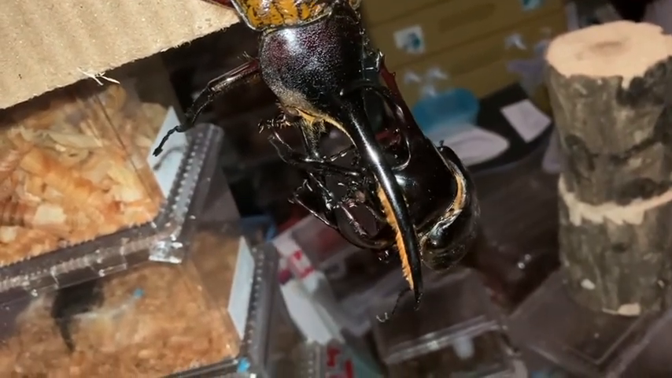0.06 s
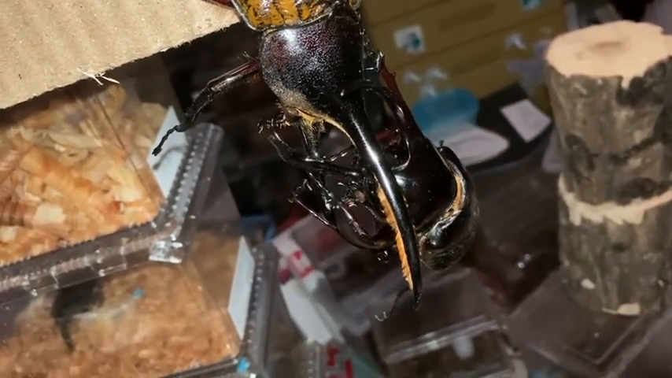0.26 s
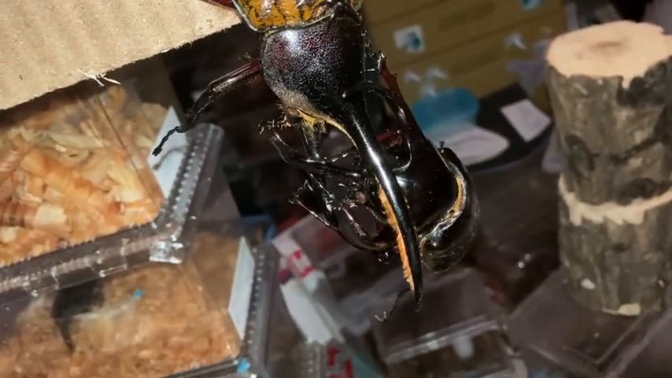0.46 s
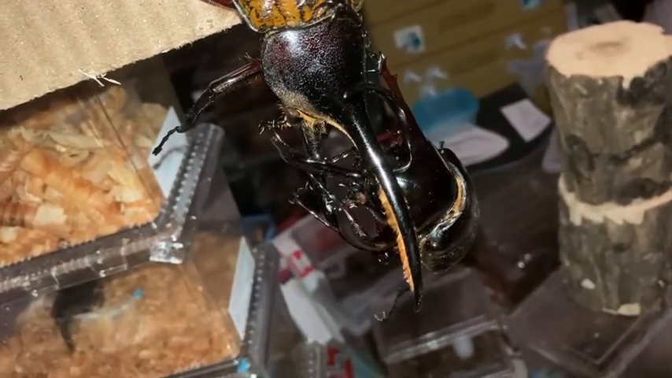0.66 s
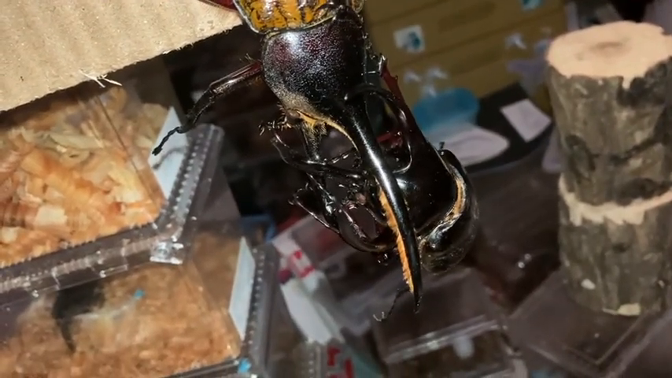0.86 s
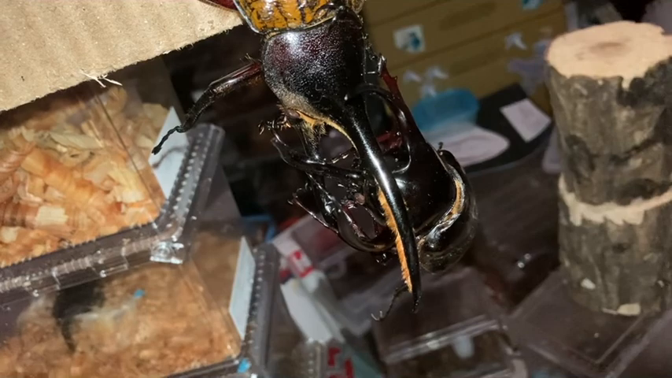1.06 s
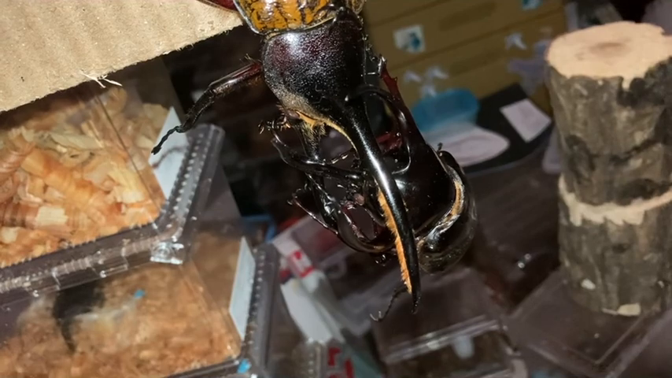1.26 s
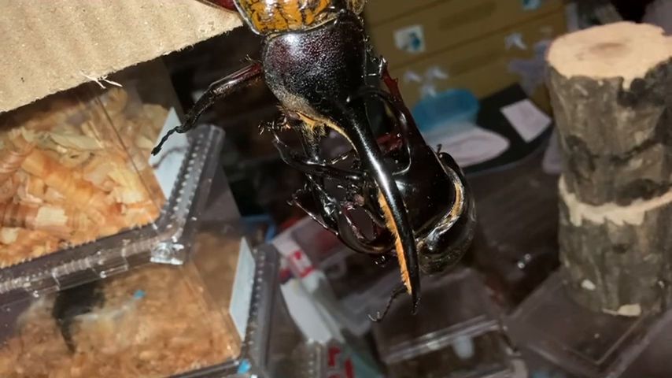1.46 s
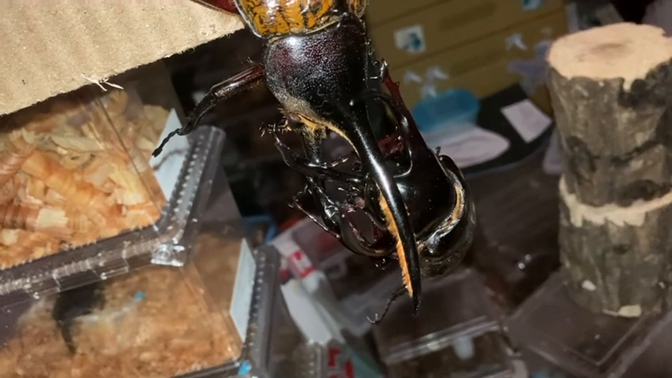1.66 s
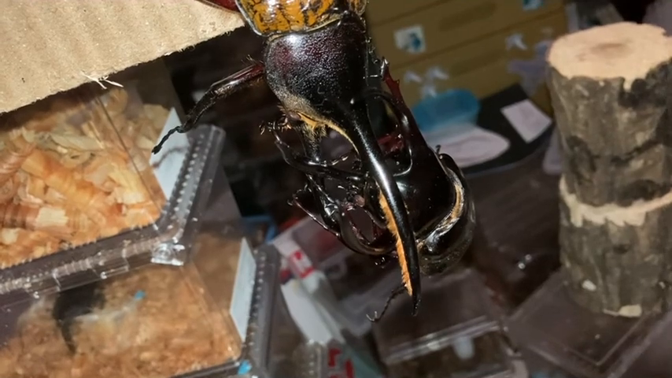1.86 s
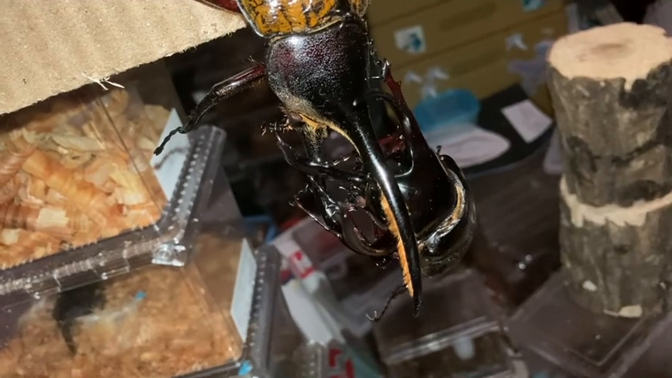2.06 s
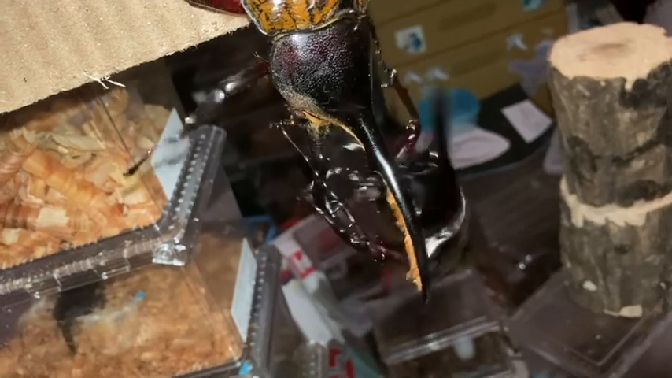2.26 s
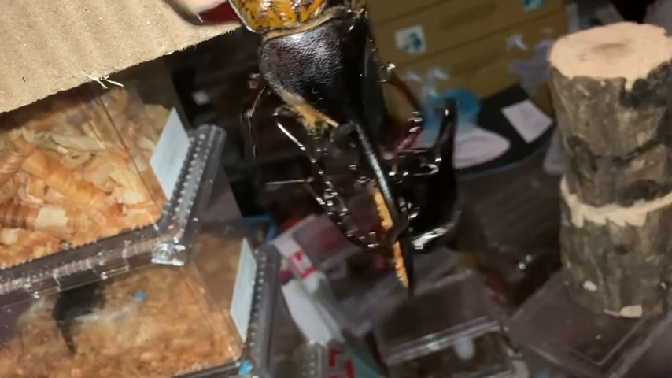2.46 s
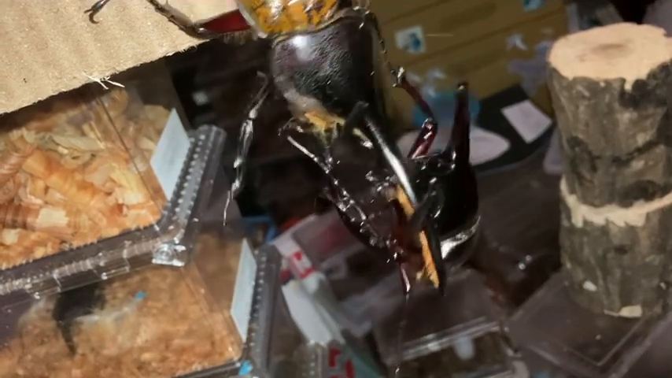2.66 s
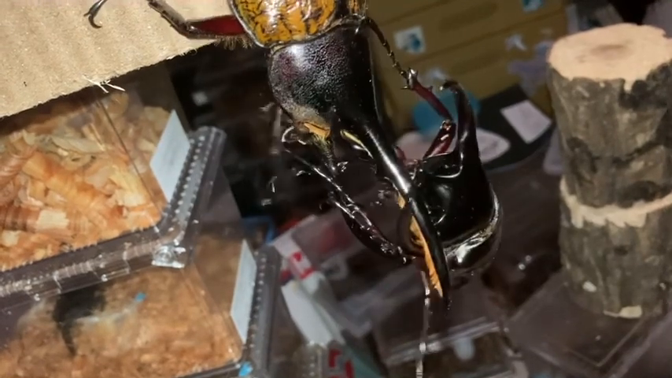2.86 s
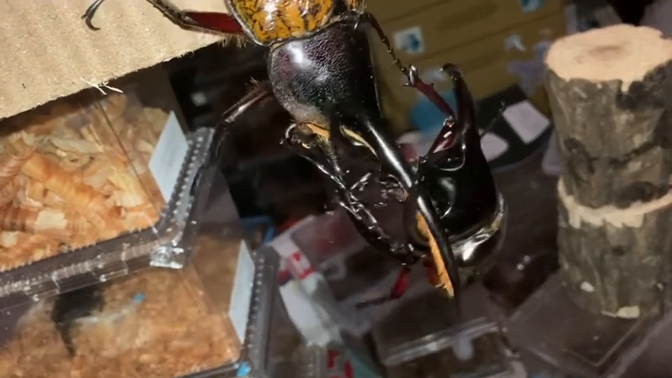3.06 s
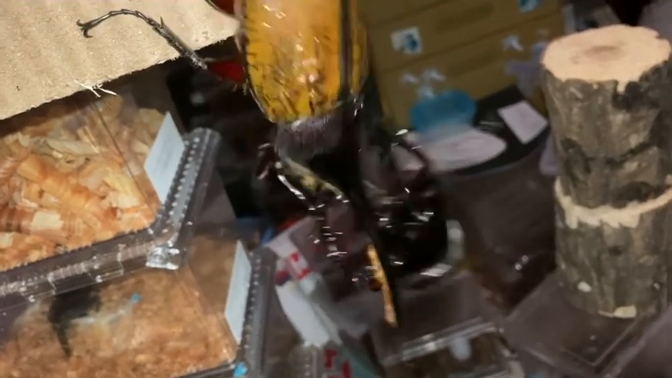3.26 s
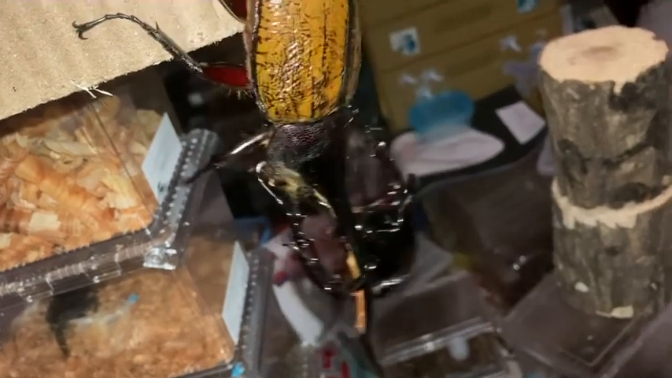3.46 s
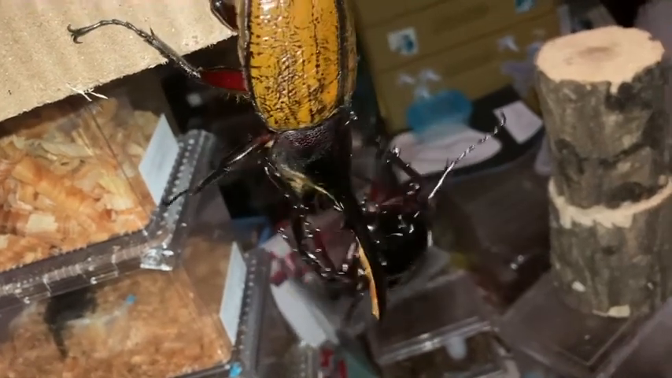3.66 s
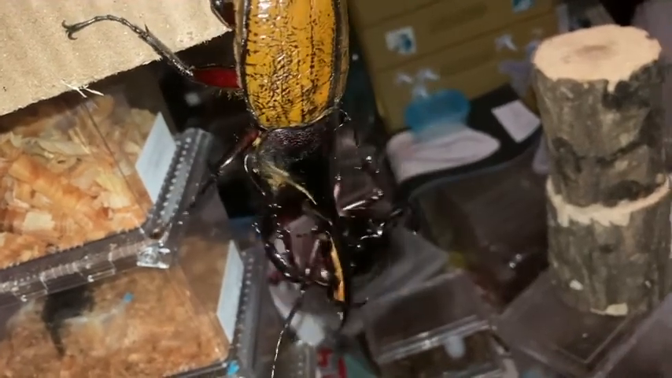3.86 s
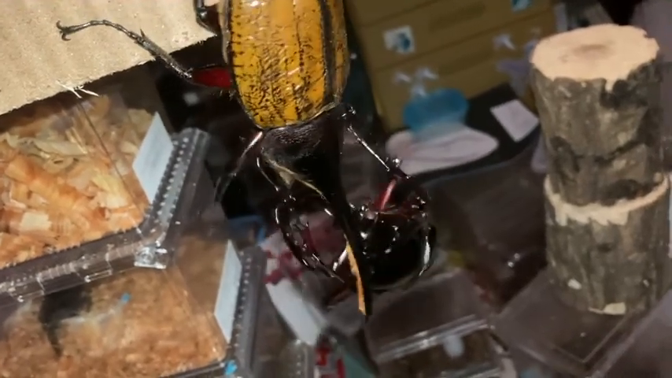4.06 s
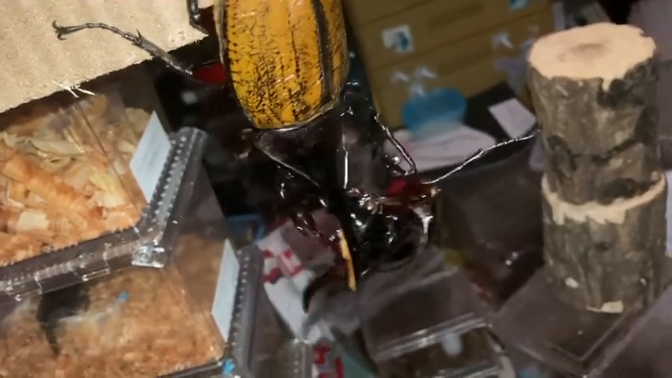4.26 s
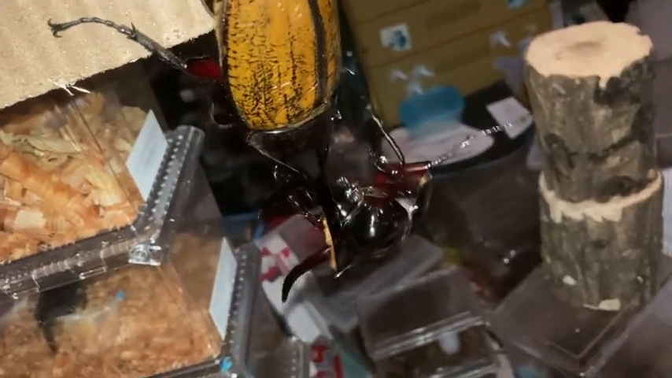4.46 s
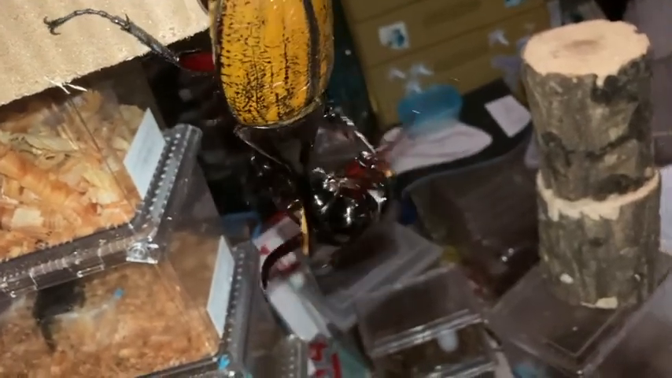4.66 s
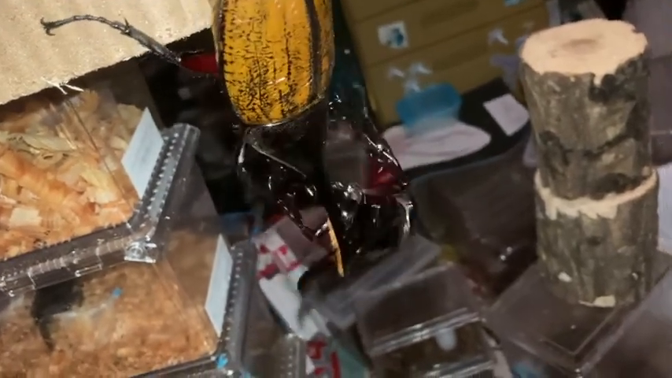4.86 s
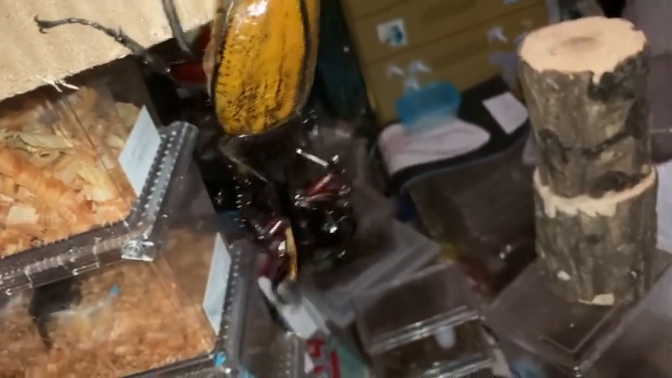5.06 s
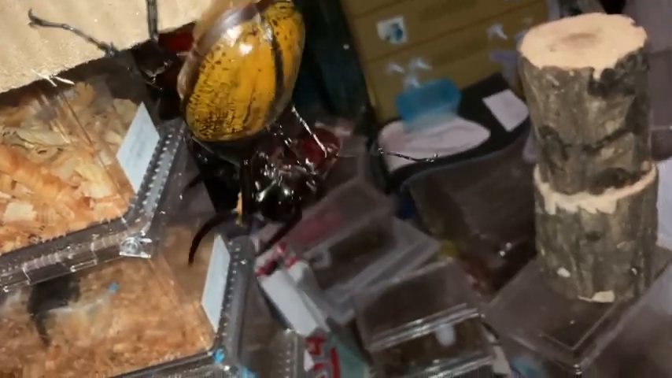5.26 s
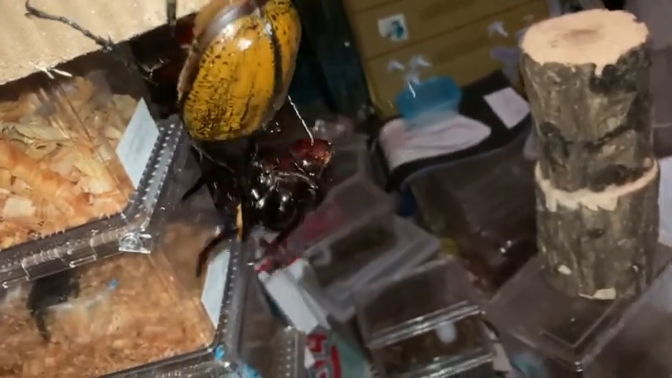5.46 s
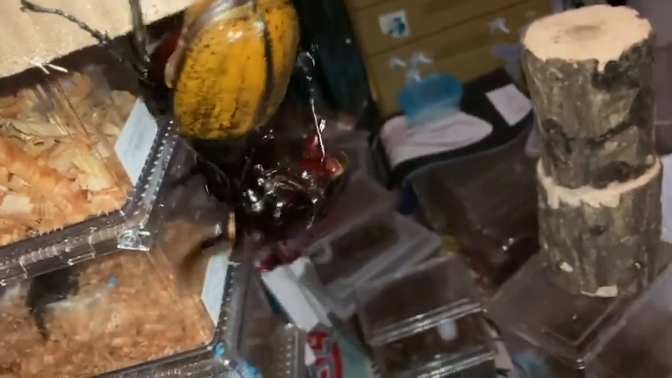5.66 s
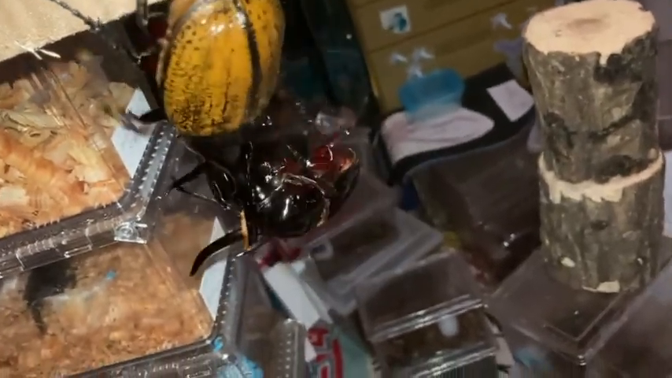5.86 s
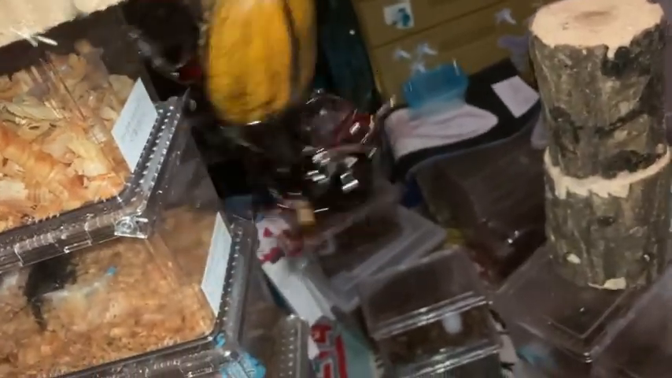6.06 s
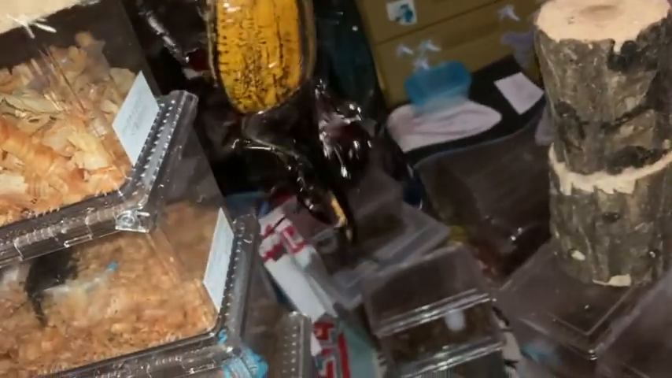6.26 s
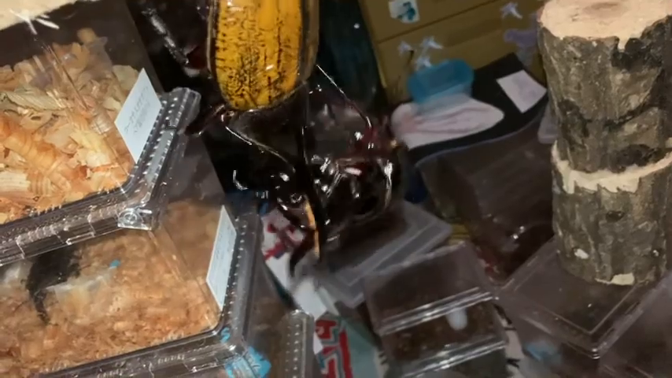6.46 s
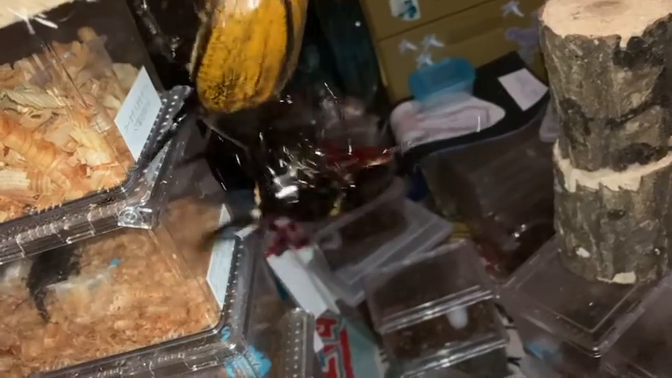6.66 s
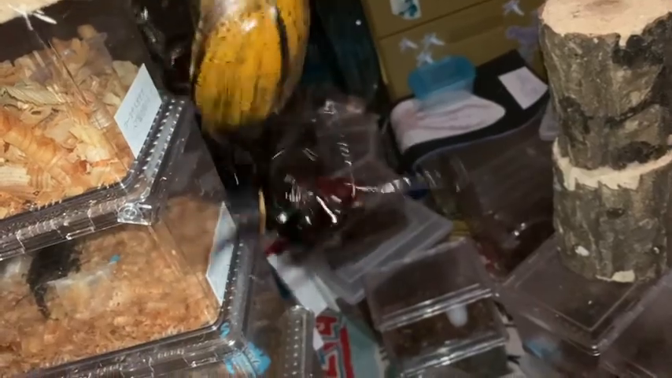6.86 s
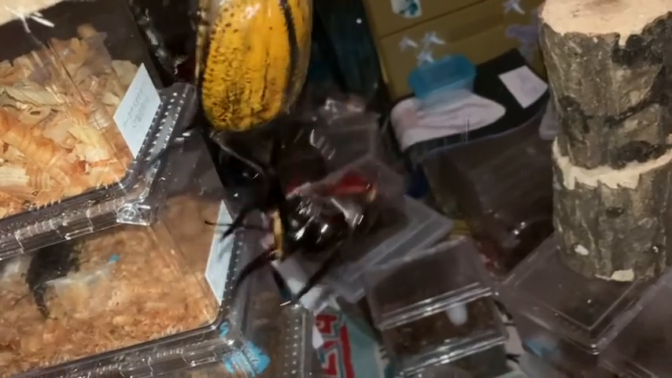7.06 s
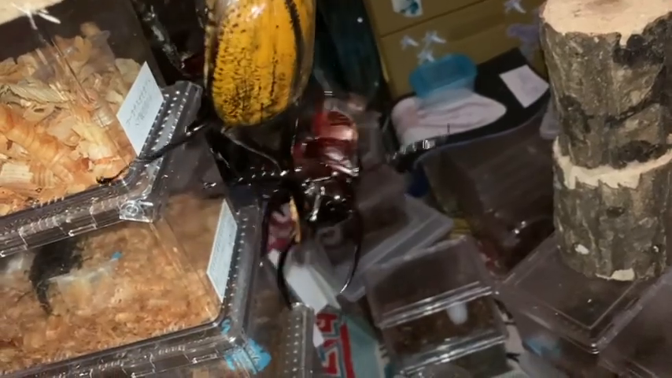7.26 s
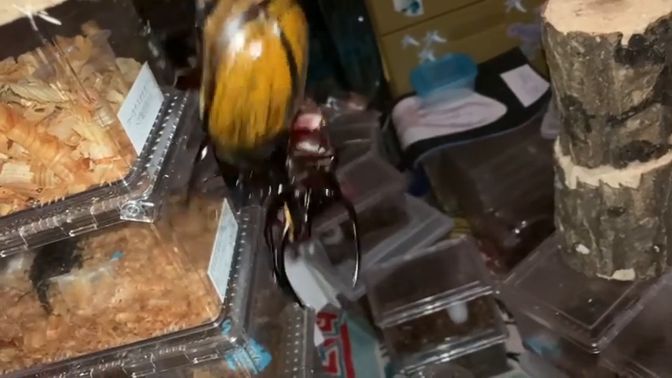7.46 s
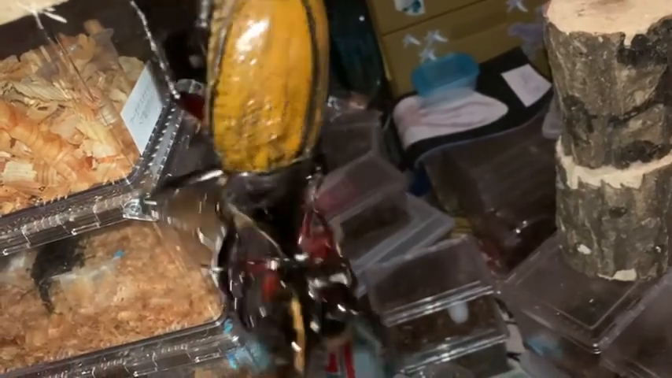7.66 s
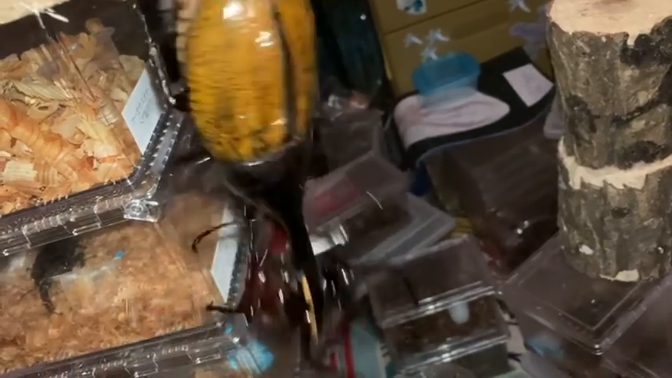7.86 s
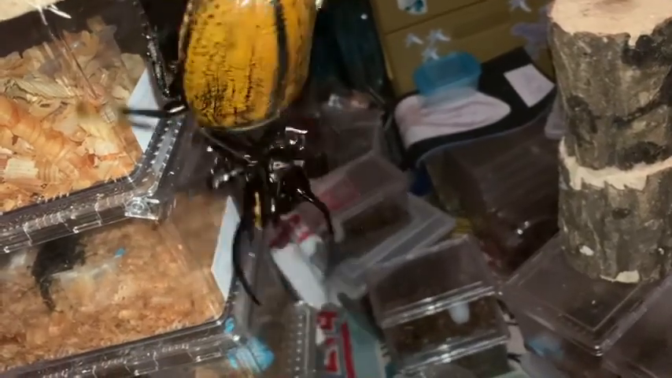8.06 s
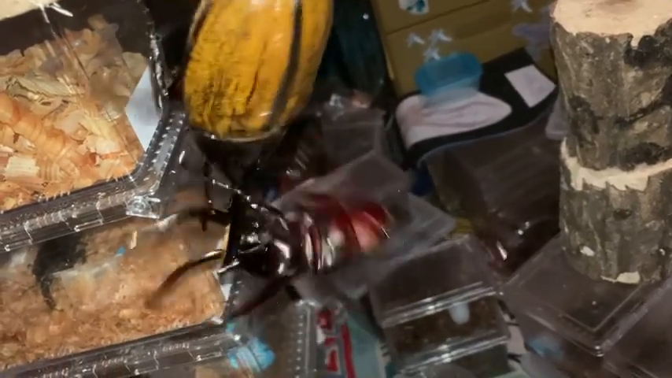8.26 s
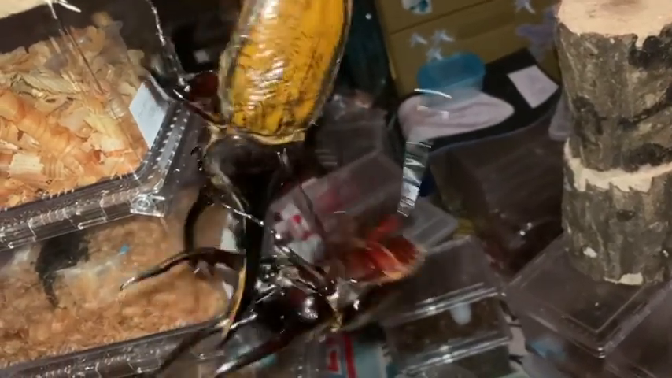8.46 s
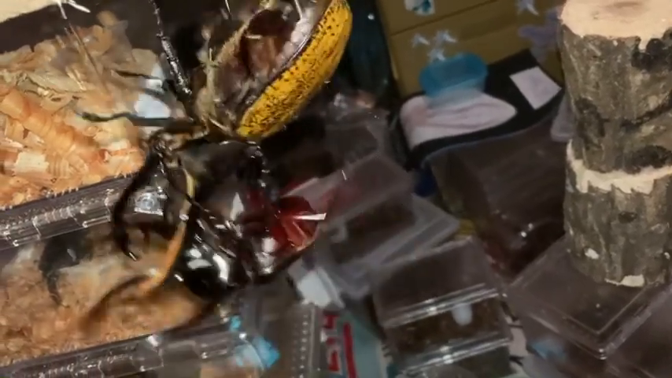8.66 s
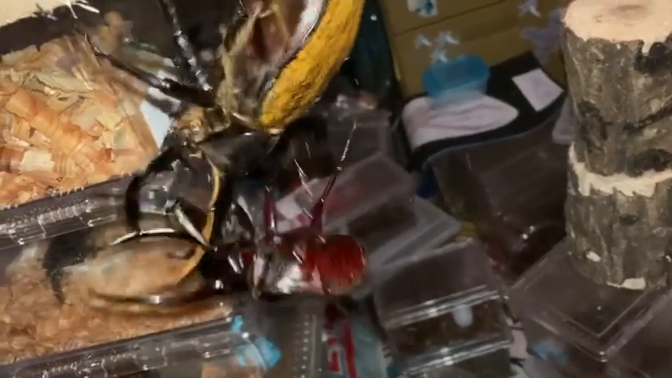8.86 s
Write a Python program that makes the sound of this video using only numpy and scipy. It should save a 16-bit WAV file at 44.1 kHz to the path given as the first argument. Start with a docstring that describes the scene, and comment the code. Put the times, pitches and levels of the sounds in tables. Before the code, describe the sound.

In a small room with a faint appliance hum, a hand softly creaks and rumbles on the microphone. From about two seconds, two large beetles wrestle on a cardboard edge. Their claws and horns snap off hard shells with sharp, dry clicks and brief sizzling scrapes, lightly knocking the cardboard, while their legs tick in between. The close clicking grows busier midway and continues irregularly to the end.

```python
"""A small room, close up, on a hand-held phone's stereo microphone. An appliance hums throughout.
First the hand creaks on the phone's case, then the shifting grip rumbles. From about two seconds on,
two big beetles wrestle on the edge of a cardboard sheet above plastic tubs. Claws and horns snap off
each other and scrape in stick-slip strokes that sizzle at the tip, ring the hard shells and shake
the board, while the other legs fidget and tick."""
import sys
import numpy as np
from scipy import signal
from scipy.fft import rfft, irfft, next_fast_len
from scipy.io import wavfile

SR = 44100
rng = np.random.default_rng(int(sys.argv[2]) if len(sys.argv) > 2 else 0)


def int16_out(signal):
    """Quantize to a 16-bit WAV file."""
    q = np.round(np.clip(np.atleast_2d(signal).T, -1, 1) * 32767)
    wavfile.write(sys.argv[1], SR, q.astype(np.int16))


N = 393372
TIME = np.arange(N) / SR

# a claw or horn slips free and may skid on (relative levels): start_s, tip_db, shell_db, board_db, skid_s
SNAPS = [(1.875, -77, -79, -79, 0), (2.223, -72, -76, -58, 0), (2.4316, -38.5, -40.5, -42, 0.049),
         (2.6732, -54, -39.5, -65, 0.039), (3.076, -74, -51.5, -69, 0), (3.1507, -52, -41.5, -55.5, 0.049),
         (3.3765, -36.5, -32.5, -61, 0.0022), (3.829, -44, -62, -63, 0), (4.2583, -44, -54, -59, 0),
         (4.3435, -59, -36, -52.5, 0), (4.3651, -35, -41, -50.5, 0.0021),
         (4.4649, -44.5, -43.5, -53, 0.00035), (4.6722, -50.5, -53, -72, 0), (4.733, -64, -52, -58, 0),
         (4.8114, -40, -41, -65, 0.0036), (4.8598, -48, -54, -62, 0.00021), (4.8894, -36, -40, -65, 0.0033),
         (4.8957, -54, -35.5, -49.5, 0.021), (5.0596, -54, -40, -49, 0.045),
         (5.088, -32.5, -32, -49.5, 0.033), (5.2425, -37, -37, -60, 0.051),
         (5.4274, -40, -48, -51.5, 0.062), (5.5687, -40, -63, -52, 0), (5.638, -39.5, -55, -53, 0),
         (5.68, -35, -43.5, -91, 0.048), (5.7401, -38, -32.5, -46.5, 0.014), (5.97, -37, -41, -43, 0.064),
         (5.9811, -40.5, -34.5, -37, 0.051), (5.999, -39, -49, -44.5, 0),
         (6.0207, -30.5, -35.5, -47, 0.019), (6.0937, -36, -42.5, -71.5, 0),
         (6.1134, -41.5, -29, -45, 0.0014), (6.2379, -39.5, -41.5, -72, 0.039), (6.3657, -51, -53, -57, 0),
         (6.3782, -45.5, -45.5, -51, 0.051), (6.553, -51.5, -54, -55, 0.00033),
         (6.762, -43.5, -32, -40.5, 0.027), (6.8087, -38, -39.5, -52, 0), (6.849, -38.5, -50, -74, 0),
         (6.8767, -34, -37.5, -41.5, 0.033), (6.975, -49.5, -53, -53.5, 0), (7.1426, -46.5, -71, -75, 0),
         (7.3498, -66.5, -55.5, -80, 0), (7.4329, -82, -40, -49, .03), (7.453, -47.5, -37.5, -43.5, 0.039),
         (7.4992, -47.5, -42.5, -56, .03), (7.563, -48, -40.5, -58, 0.032),
         (7.5808, -54, -44, -47.5, 0.0012), (7.7418, -46.5, -48, -53, 0), (7.907, -42.5, -47, -59, 0),
         (7.9348, -35.5, -56, -70, 0), (8.064, -55, -64.5, -85, 0), (8.0974, -43.5, -40, -62, 0.00022),
         (8.132, -56.5, -43, -57, 0.067), (8.1945, -45, -42, -54, 0.027), (8.3196, -73, -40, -56, 0),
         (8.335, -45, -41.5, -63, 0.019), (8.381, -46.5, -38, -51.5, 0.0046),
         (8.438, -65, -51.5, -56, 0.00035), (8.7742, -36, -50, -76, 0), (8.8563, -39, -49, -58.5, 0.018)]
# how busily the legs fidget between strokes: time_s, effort_db
LEG_EFFORT = [(2.1, -90.5), (2.3, -58.5), (2.62, -60.5), (3.08, -62), (3.38, -53), (3.68, -65),
              (4.15, -56.5), (4.62, -67), (4.85, -56.5), (6.25, -56), (6.51, -73.5), (6.86, -57),
              (7.3, -70), (7.58, -62), (8.0, -69), (8.35, -54), (8.7, -79.5), (8.92, -57)]
# resonances of horn and wing cases: pitch_hz, level_db, t60_s
SHELL_MODES = [(1253, 2.5, 0.054), (1496, 9.5, 0.016), (1685, 6.5, 0.016), (2233, 2.5, 0.018),
               (2446, -1, 0.019), (3060, -14, 0.0049), (3822, 2, 0.01), (4345, 3, 0.011),
               (4970, -7.5, 0.0067)]
# resonances of cardboard sheet and tub: pitch_hz, level_db, t60_s
BOARD_MODES = [(242.5, -0.5, 0.034), (321.4, 2, 0.057), (393, -5, 0.076), (591, -6, 0.097),
               (666, -3, 0.079), (822.6, 0.5, 0.039), (908, 0, 0.089), (1094, -12, 0.089)]


def undb(db):
    """Decibels to gain."""
    return 10 ** (np.asarray(db) / 20)


def unit(x):
    """Scale to rms 1."""
    return x / np.sqrt(np.mean(x ** 2) + 1e-20)


def colour(x, points):
    """Shape a sound by points of frequency_hz, gain_db."""
    hz, db = np.transpose(points)
    size = next_fast_len(x.shape[-1])
    bins_hz = np.fft.rfftfreq(size, 1 / SR)
    gain = undb(np.interp(np.log(bins_hz + 1), np.log(hz), db))
    return irfft(rfft(x, size) * gain, size)[..., :x.shape[-1]]


def band(x, lo_hz, hi_hz, order=2):
    """Band-pass filter."""
    return signal.sosfilt(signal.butter(order, [lo_hz, hi_hz], "band", fs=SR, output="sos"), x)


def band_noise(lo_hz, hi_hz, order=2):
    """Noise in one band, at rms 1."""
    return unit(band(rng.standard_normal(N), lo_hz, hi_hz, order))


def swell(s, rise_s, hold_s, fall_s):
    """Envelope that grows to 1 at time s, holds and dies away."""
    return np.exp(np.minimum(TIME - s, 0) / rise_s - np.maximum(TIME - s - hold_s, 0) / fall_s)


def add(out, s, x):
    """Mix a stereo sound in at time s."""
    i = int(s * SR)
    out[:, i:i + x.shape[1]] += x[:, :N - i]


def diffuse(size):
    """Noise from all directions: alike at both microphone ports in the bass, unrelated in the treble."""
    mid, side = rng.standard_normal((2, size))
    side = colour(side, [(100, -10.5), (600, -1.5), (2000, 0.5), (6000, 1)])
    return np.array([mid + side, mid - side])


def room_tone(level_db=-68):
    """Still room air, mostly bass, all around the microphone."""
    # spectrum of the air: frequency_hz, density_db
    air_spectrum = [(20, -29), (64, -3), (125, -7), (160, -11), (210, -12), (300, -18.5), (600, -29),
                    (1500, -36), (4000, -41), (6500, -45), (8300, -44.5), (11500, -45), (14500, -53),
                    (16500, -75)]
    return undb(level_db) * unit(colour(diffuse(N), air_spectrum))


def appliance_hum(waver=0.13):
    """An appliance hums in low tones, each wavering slightly in level."""
    # tones of the hum: pitch_hz, level_db
    hum_tones = [(60, -80), (119.5, -75.5), (199.6, -69.5)]
    hum = np.zeros(N)
    for hz, db in hum_tones:
        tone = np.sqrt(2) * undb(db) * np.sin(2 * np.pi * hz * TIME)
        hum += tone * (1 + waver * band_noise(1, 6.1, order=1))
    return hum


def hand_creak(peak_s=0.357, judder_hz=63, judder_db=-52.5, rustle_db=-83):
    """Skin judders on the phone's case in one run of soft pulses, with a faint rustle."""
    cycles = np.cumsum(judder_hz * (1 + 0.04 * band_noise(2, 25))) / SR
    pulses = np.diff(np.floor(cycles), prepend=0) * (1 + 0.25 * band_noise(5, 50))
    judder = unit(colour(pulses, [(25, -33), (60, 5.5), (125, -1), (190, -7), (310, -16), (600, -64)]))
    judder *= undb(judder_db) * swell(peak_s, rise_s=0.022, hold_s=0.17, fall_s=0.066)
    rustle = band_noise(400, 2400, order=1)
    rustle *= undb(rustle_db) * swell(peak_s, rise_s=0.2, hold_s=0.17, fall_s=0.066)
    return judder + rustle


def grip_rumble():
    """Handling noise: the phone rumbles briefly each time the grip shifts."""
    # shifts of the grip: peak_s, level_db
    grip_shifts = [(.78, -51), (1.0, -61), (1.559, -69), (1.71, -57.5)]
    spectrum = [(12, -21), (30, -2), (60, 4.5), (90, 3), (200, -13), (1000, -64)]
    envelope = sum(undb(db) * swell(s, rise_s=0.069, hold_s=0.021, fall_s=0.061) for s, db in grip_shifts)
    return envelope * unit(colour(rng.standard_normal(N), spectrum))


def tip_crack(lag_s=0.000304, scatter_db=-10, scatter_s=0.0018):
    """A claw tip rings high; its crack reaches the left port, then the right inverted. Tubs scatter it."""
    t = TIME[:256]
    scatter = np.exp(-t / scatter_s) * np.sqrt(2 / (scatter_s * SR))
    paths = undb(scatter_db) * rng.standard_normal((2, len(t))) * scatter
    paths[0] += np.sinc(t * SR - 2)
    paths[1] -= np.sinc((t - lag_s) * SR - 2)
    claw = signal.iirpeak(rng.uniform(6500, 13000), Q=6, fs=SR)
    return paths + signal.lfilter(*claw, paths)


def shell_pitch(s, sharpness_db, octaves_per_db, blunt_hz=1470, even_hz=3780, sharp_hz=4370):
    """The pitch a contact favours in the shell: higher when it is sharp (tip louder than shell)."""
    hz = min(even_hz * 2 ** (octaves_per_db * sharpness_db), sharp_hz)
    if s < 3.16:  # while the long horns are locked the contacts fall on them, and they ring lower
        hz *= 0.6
    return max(hz, blunt_hz)


def ring(modes, pitch_hz, octaves, detune, width, rattle_db, rattle_s):
    """Stereo ring of a body; the place of contact favours the modes near one pitch."""
    hz, db, t60 = np.transpose(modes)[:, :, None]
    t = TIME[:int(t60.max() * SR)]
    shift, size, left, right = rng.standard_normal((4, len(modes), 1))
    gain = undb(db + 2 * size) / (1 + (np.log2(hz / pitch_hz) / octaves) ** 2) / np.sqrt(t60)
    waves = gain * np.exp((2j * np.pi * hz * (1 + detune * shift) - np.log(1000) / t60) * t)
    # each microphone port hears a mode at its own phase
    ports = rng.choice([-1, 1], hz.shape) * np.exp(1j * width * np.hstack([left, right]))
    # countless weaker modes merge into a short dry rattle around the same pitch
    shared, own = rng.standard_normal(len(t)), rng.standard_normal((2, len(t)))
    rattle = (shared + width * own) * np.exp(-t / rattle_s)
    rattle = colour(rattle, [(pitch_hz / 4, -18), (pitch_hz, 0), (pitch_hz * 4, -18)])
    return unit((ports.T @ waves).imag) + undb(rattle_db) * unit(rattle * (t < t[-1] / 2))


def strike(out, s, force, bodies, levels_db, length_s):
    """A force drives each body into its own track, levelled as if all the energy lay within length_s."""
    for track, response, db in zip(out, bodies, levels_db):
        sound = signal.fftconvolve(force[None], response, axes=1)
        gain = undb(db) * np.sqrt(2 * length_s * SR / (np.sum(sound ** 2) + 1e-20))
        add(track, s, gain * sound)


def snaps(creep_s=0.002, creep_db=-8, splinter_s=0.00067, splinter_db=-1):
    """A claw or horn creeps for an instant, releases hard and splinters."""
    out = np.zeros((3, 2, N))  # stereo tracks of tips, shells, board
    t = TIME[:440] - TIME[260]  # zero at the release
    creep = undb(creep_db) * unit(np.exp(-abs(t) / creep_s))
    splinter = undb(splinter_db) * unit(np.exp(-abs(t) / splinter_s))
    roughness = np.where(t < 0, creep, splinter) * np.sqrt(2 / len(t))
    for s, tip_db, shell_db, board_db, _ in SNAPS:
        force = roughness * rng.standard_normal(len(t)) + (t == 0)
        shell_hz = shell_pitch(s, tip_db - shell_db, octaves_per_db=0.068)
        shell = ring(SHELL_MODES, shell_hz, octaves=0.74, detune=0.023, width=0.56,
                     rattle_db=-6.5, rattle_s=0.0023)
        board_hz = np.interp(board_db, [-56, -42], [640, 330])  # heavier blows reach lower modes
        board = ring(BOARD_MODES, board_hz, octaves=1.53, detune=0.056, width=0.13,
                     rattle_db=-3.5, rattle_s=0.012)
        levels_db = tip_db, shell_db, board_db - 1
        strike(out, s + t[0], force, (tip_crack(), shell, board), levels_db, length_s=0.0077)
    return out


def slips(size, per_second, spread_db):
    """Stick-slip: many tiny releases at random moments, a few of them large."""
    sizes = undb(spread_db * np.minimum(rng.exponential(size=size), 4))
    return (rng.random(size) < per_second / SR) * sizes * rng.choice([-1, 1], size)


def drags(skid_db=(-52, -50, -56), skid_share=0.2):
    """All dragging contacts: the strokes, and the skids after snaps in the same columns."""
    # a claw or horn drags (relative levels): start_s, length_s, tip_db, shell_db, board_db
    strokes = [(2.135, 0.034, -73, -73.5, -80), (2.25, 0.073, -61, -63.5, -69),
               (2.486, .034, -37, -55, -68), (2.518, 0.025, -40.5, -59, -66),
               (2.816, 0.04, -79, -50.5, -58.5), (2.87, 0.035, -69, -55.5, -65),
               (2.934, 0.034, -57, -53, -64), (3.017, 0.019, -68, -53.5, -59.5),
               (3.18, 0.067, -40.5, -45, -54), (3.242, 0.089, -55, -48, -57.5),
               (3.41, 0.06, -66, -51.5, -62.5), (3.468, 0.041, -53.5, -44, -61),
               (3.568, 0.056, -61, -50.5, -50.5), (3.656, 0.017, -78, -57, -51),
               (3.71, .047, -57.5, -52, -54), (3.861, .038, -55.5, -60, -50),
               (3.943, 0.053, -52.5, -58, -55), (4.039, 0.031, -54, -56.5, -64),
               (4.2, 0.03, -66, -62.5, -71), (4.34, 0.043, -40.5, -43, -47),
               (4.385, 0.061, -56.5, -52, -63.5), (4.472, 0.032, -62, -52, -57),
               (4.797, .025, -53, -50, -64), (4.997, 0.1, -51, -52.5, -72),
               (5.195, 0.036, -53.5, -49.5, -70), (5.335, 0.028, -53, -51, -56.5),
               (5.537, 0.039, -58, -55, -70), (5.598, 0.033, -55, -70, -62), (5.801, 0.059, -53, -51, -57),
               (5.932, 0.072, -48, -55.5, -68.5), (6.155, 0.036, -52.5, -52, -51.5),
               (6.555, 0.042, -66, -66.5, -66.5), (6.66, 0.098, -56.5, -59.5, -74.5),
               (6.99, 0.047, -61.5, -56.5, -63), (7.667, .038, -56.5, -56, -56.5),
               (7.711, 0.054, -49.5, -57, -56), (7.865, .05, -49, -56, -66), (8.21, 0.075, -56.5, -52, -51),
               (8.364, 0.035, -51, -52, -52.5), (8.524, .034, -52.5, -51, -65),
               (8.788, 0.085, -50, -53, -65), (8.885, 0.036, -59, -53.5, -65)]
    rows = np.array(SNAPS)
    start_s, levels_db, length_s = rows[:, 0], rows[:, 1:4], rows[:, 4]
    extra_db = levels_db - levels_db.mean(axis=0)  # a stronger snap skids louder
    skids = np.column_stack([start_s, length_s, skid_db + skid_share * extra_db])
    return np.vstack([strokes, skids[length_s > 0]])


def unrest(busy_db=2, stir_db=-7.5):
    """How hard the legs work: their slow effort, plus a flurry as each drag unsettles them."""
    power = undb(np.interp(TIME, *np.transpose(LEG_EFFORT)) + busy_db) ** 2
    for start_s, length_s, _, shell_db, _ in drags():
        flurry = swell(start_s, rise_s=0.0071, hold_s=length_s, fall_s=0.028)
        power += (undb(shell_db + stir_db) * flurry) ** 2
    return np.sqrt(power)


def fidget(step_s=0.07, wander_octaves=0.18, levels_db=(-5, -4.5, -11.5)):
    """The other legs keep shifting their hold, each touch in a new place."""
    out = np.zeros((3, 2, N))
    pressure = np.hanning(int(2 * step_s * SR))
    for s in np.arange(LEG_EFFORT[0][0] - step_s, TIME[-1] - step_s, step_s):
        force = pressure * slips(len(pressure), per_second=1500, spread_db=4.5)
        shell_hz = 3400 * 2 ** (wander_octaves * rng.standard_normal())
        shell = ring(SHELL_MODES, shell_hz, octaves=0.95, detune=0.046, width=1.0,
                     rattle_db=-1.5, rattle_s=0.0053)
        board = ring(BOARD_MODES, pitch_hz=630, octaves=6.7, detune=0.045, width=0.3,
                     rattle_db=2.5, rattle_s=0.0015)
        strike(out, s, force, (tip_crack(), shell, board), levels_db, step_s)
    return out * unrest()


def scrapes(bite_s=0.005):
    """A dragged claw or horn bites quickly, chatters and lets go."""
    out = np.zeros((3, 2, N))
    for start_s, length_s, tip_db, shell_db, board_db in drags():
        length_s = max(length_s, 0.01)
        t = TIME[:int(1.15 * length_s * SR)]
        pressure = np.minimum(t / bite_s, 1) * np.exp(-0.16 * t / length_s)
        release = np.minimum((t[-1] - t) / (0.48 * length_s), 1)
        force = pressure * release * slips(len(t), per_second=2200, spread_db=4)
        shell_hz = shell_pitch(start_s, tip_db - shell_db, octaves_per_db=0.04)
        shell = ring(SHELL_MODES, shell_hz, octaves=0.84, detune=0.025, width=0.5,
                     rattle_db=-3, rattle_s=0.00093)
        board = ring(BOARD_MODES, pitch_hz=678, octaves=0.59, detune=0.03, width=0.62,
                     rattle_db=-6, rattle_s=0.0078)
        strike(out, start_s, force, (tip_crack(), shell, board), (tip_db, shell_db, board_db), length_s)
    return out


def spine_ticks(count=50):
    """Leg spines flick past each other at random moments, louder when the legs are busy."""
    out = np.zeros((3, 2, N))
    for s in rng.uniform(LEG_EFFORT[0][0], TIME[-1], count):
        effort_db = np.interp(s, *np.transpose(LEG_EFFORT))
        shell = ring(SHELL_MODES, pitch_hz=4370, octaves=0.56, detune=0.05, width=0.86,
                     rattle_db=2, rattle_s=0.0012)
        strike(out, s, np.ones(1), (tip_crack(), shell), (effort_db + 7, effort_db - 1), length_s=0.0048)
    return out


def room(x, wet_db=-14, t60_s=0.29, gap_s=0.007):
    """Cluttered shelves return a short, duller tail behind the close sound."""
    t = TIME[:SR // 2]
    tail = colour(diffuse(len(t)), [(200, 15), (1500, -4), (5000, -4), (15000, -14)])
    tail *= undb(-60 * t / t60_s) * (t > gap_s)
    tail = unit(tail) / np.sqrt(2 * len(t))
    return x + undb(wet_db) * signal.fftconvolve(x, tail, axes=1)[:, :N]


def scene():
    """Tips, shells and board sound close to the microphone, over handling noise, room tone and hum."""
    # spectrum of the bare crack at a claw tip: frequency_hz, gain_db
    tip_spectrum = [(1500, -44), (4000, -27.5), (5600, -2.5), (7800, 1), (11400, -0.5), (13000, -4),
                    (15600, -5), (16500, -31)]
    tips, shells, board = snaps() + scrapes() + fidget() + spine_ticks()
    # the shells lie a little to the right, so the left port hears them two samples later
    shells[0] = np.roll(shells[0], 2)
    beetles = undb(3.5) * colour(tips, tip_spectrum) + band(shells, 810, 8800) + band(board, 133, 1930)
    return room(beetles) + hand_creak() + grip_rumble() + room_tone() + appliance_hum()


def record(dry):
    """The phone cuts the top steeply above 16.4 kHz."""
    return signal.sosfilt(signal.ellip(8, 0.2, 70, 16400, fs=SR, output="sos"), dry)


dry = scene()
out = record(dry)
int16_out(out)
```